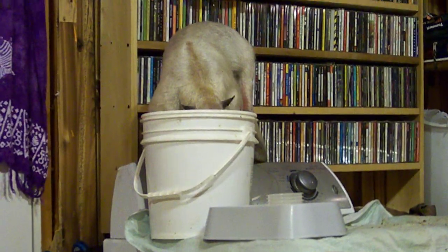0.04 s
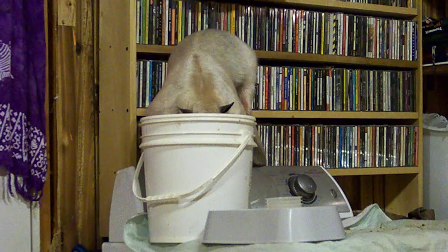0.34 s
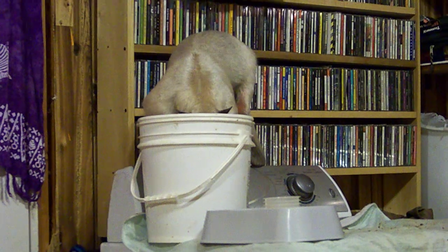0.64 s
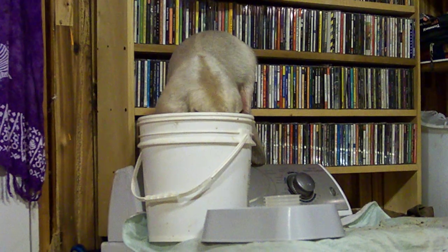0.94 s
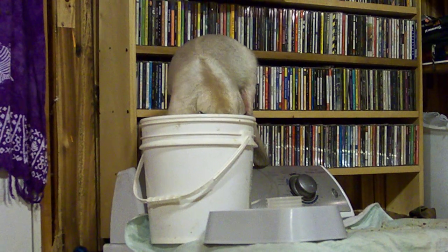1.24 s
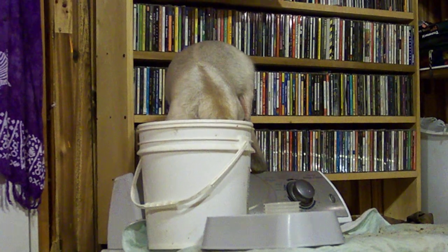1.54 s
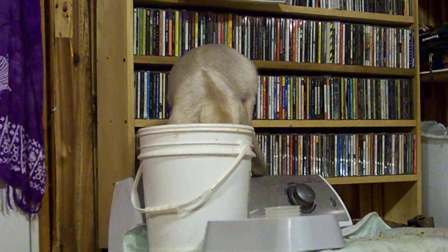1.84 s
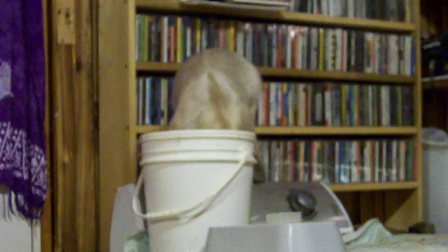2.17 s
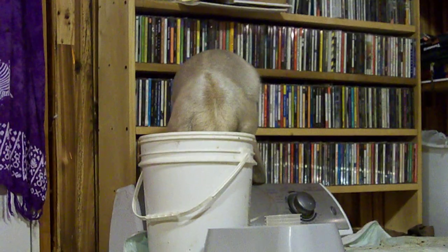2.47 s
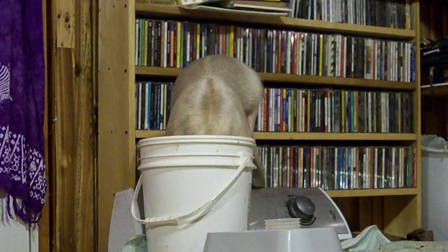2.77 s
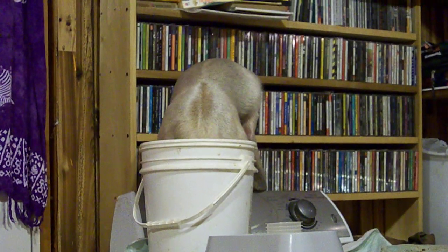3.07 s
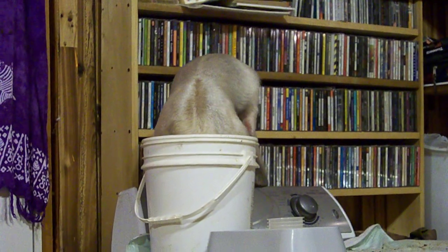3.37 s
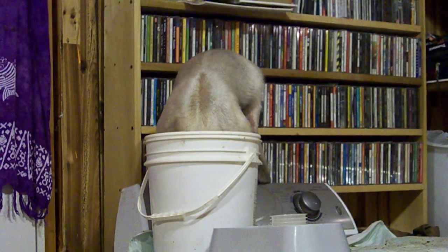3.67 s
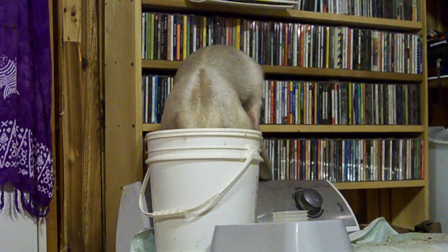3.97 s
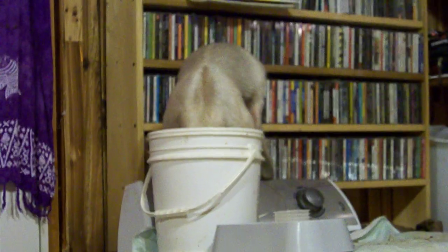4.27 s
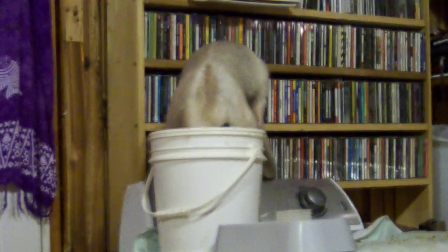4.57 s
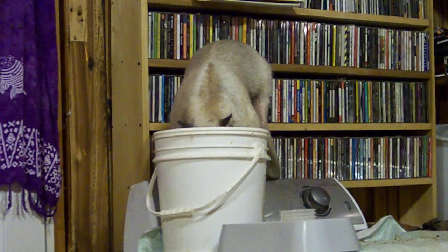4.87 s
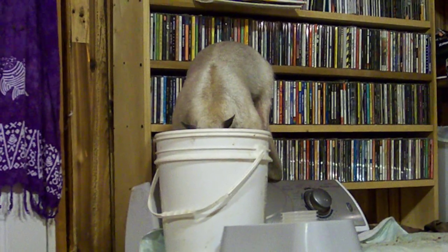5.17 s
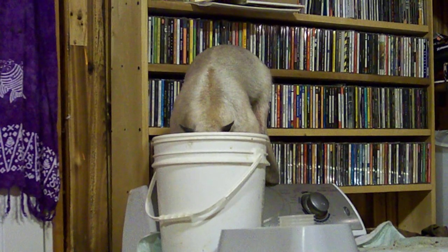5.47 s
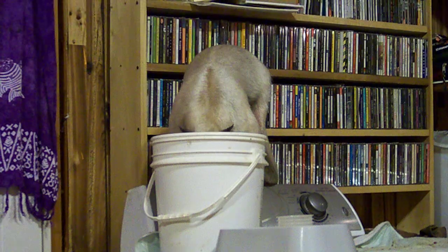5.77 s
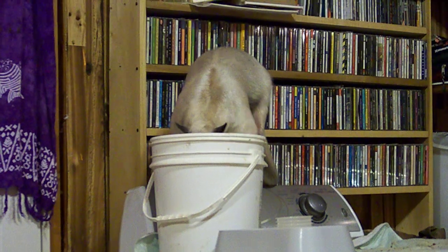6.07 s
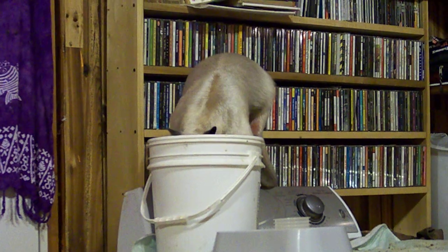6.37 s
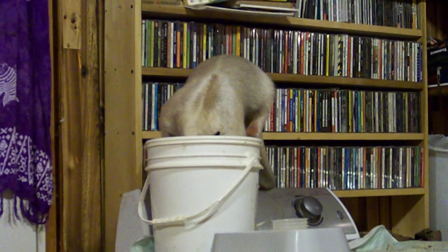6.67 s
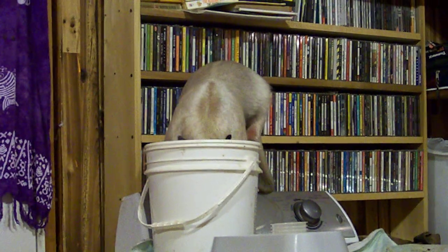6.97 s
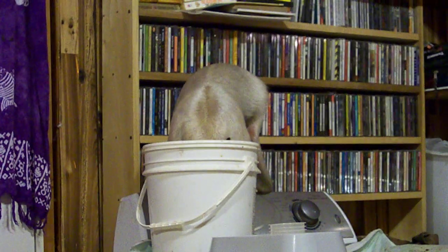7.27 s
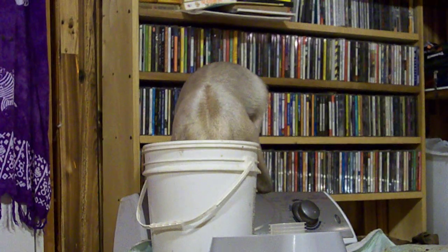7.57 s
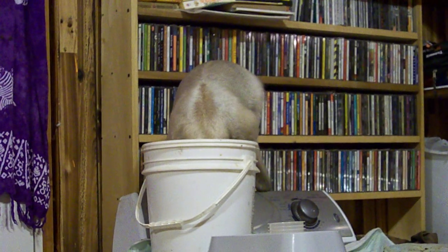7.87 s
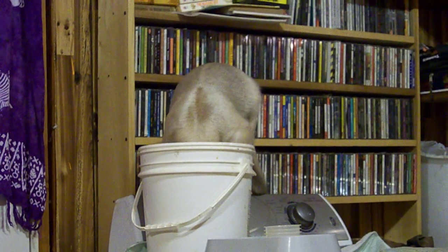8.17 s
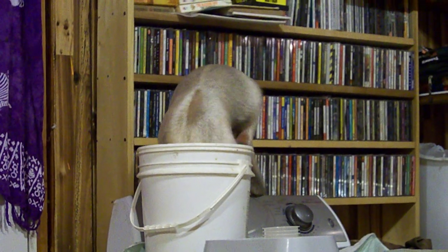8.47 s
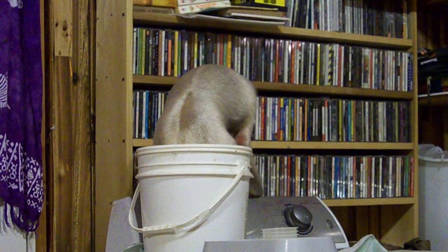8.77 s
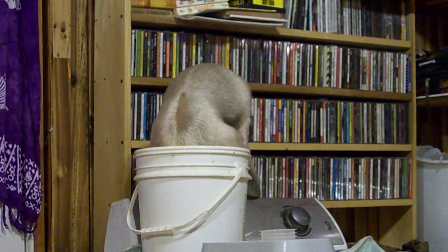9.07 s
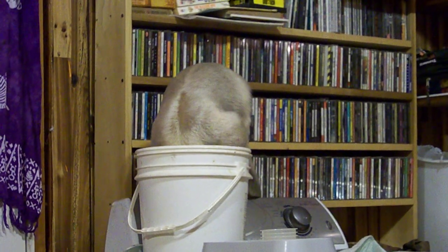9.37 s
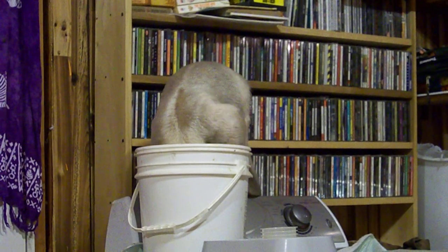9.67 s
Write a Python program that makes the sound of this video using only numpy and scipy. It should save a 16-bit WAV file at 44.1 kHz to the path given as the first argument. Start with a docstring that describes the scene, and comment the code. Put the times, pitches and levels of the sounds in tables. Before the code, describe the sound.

In a small room with a faint ventilation hum, dry food shifts and clicks inside a plastic bucket slightly to the left. A cat noses through it in two bouts separated by a short pause. Each shove brings a gritty rustle and a low hollow rub from the plastic, while single pieces crack or strike the wall. The bucket takes an occasional soft knock, and everything rings only briefly.

```python
"""Cat rooting in a food bucket

A small furnished room with faint steady ventilation; a little left of the microphone, a cat is head
down in a plastic bucket of dry food. Shoved pieces rub and tick against each other, the pushing makes
the bucket drum, single pieces snap or hit the wall, and now and then the bucket takes a soft knock.
Each of these rings briefly in the bucket and the room."""
import sys
import numpy as np
from scipy import signal
from scipy.fft import rfft, irfft
from scipy.io import wavfile
from scipy.ndimage import uniform_filter1d

SR = 44100
rng = np.random.default_rng(int(sys.argv[2]) if len(sys.argv) > 2 else 0)


def put_to_file(sound):
    """Save the sound as 16-bit audio at rate SR, in the file named by the first command-line argument."""
    columns = np.atleast_2d(sound).T  # one column per channel
    safe = np.clip(columns, -1, 1)
    whole_steps = np.round(safe * 32767)
    wavfile.write(sys.argv[1], SR, whole_steps.astype(np.int16))


N = 432621
TIME = np.arange(N) / SR

# Colour of the ventilation. Each row: frequency in Hz, gain in dB.
VENTILATION_COLOUR = [(20, -8.5), (54, -3.5), (81, -5.5), (125, -8), (228, -14), (300, -22.5), (480, -12),
                      (660, -12), (950, -19), (1160, -12), (1400, -21.5), (2120, -21.5), (6380, -24.5),
                      (8000, -35)]
# Two bouts of rooting, a pause between them. Each row: start in seconds, length in seconds.
ROOTING_BOUTS = [(0.0, 4.42), (5.88, 3.4)]
# Shoves of the muzzle. Each row: start in seconds, length in seconds, relative level of the sliding
# food in dB, relative push on the bucket in dB, brightness of the ticks in dB.
MUZZLE_SHOVES = [ (0.161, 0.038, -39, -50.5, 5.5), (0.246, 0.014, -37.5, -47, 5.5),
                 (0.354, 0.042, -44.5, -52, 0), (0.457, 0.062, -45, -48, 2.5),
                 (0.646, 0.022, -45, -48.5, 2.5), (0.798, 0.041, -42, -45, -0.5),
                 (0.872, 0.016, -50, -51, -8), (0.943, 0.014, -53.5, -58, 6),
                 (1.075, 0.18, -46, -56.5, -1.5), (1.366, 0.027, -40.5, -47, -12),
                 (1.531, 0.044, -49, -51, -4), (1.705, 0.032, -53, -48.5, -10),
                 (1.796, 0.057, -44.5, -50.5, -2), (1.943, 0.096, -47.5, -53, -3),
                 (2.125, 0.19, -40, -52.5, 3.5), (2.355, 0.2, -53, -60.5, 8),
                 (2.696, 0.035, -50, -53.5, -3), (2.827, 0.053, -50.5, -42.5, 1),
                 (2.963, 0.09, -49.5, -50.5, -4), (3.14, 0.09, -45.5, -52, -2.5),
                 (3.259, 0.035, -38, -50.5, 4.5), (3.34, 0.02, -47.5, -59, -1),
                 (3.448, 0.24, -50.5, -57, 0.5), (3.795, 0.081, -48.5, -54.5, -6),
                 (3.987, 0.051, -43.5, -55, -2), (4.195, 0.057, -48, -67, 2), (4.31, 0.027, -52, -59.5, 2),
                 (4.424, 0.23, -63.5, -71, 4), (5.873, 0.042, -45, -61, 2.5), (6.04, 0.16, -49, -54, 6.5),
                 (6.293, 0.026, -42, -46, -9.5), (6.37, 0.018, -50, -50, 0.5), (6.5, 0.051, -44, -50, -1.5),
                 (6.665, 0.059, -50, -45, -3), (6.956, 0.11, -50.5, -45.5, 4.5),
                 (7.14, 0.1, -49, -46.5, -5), (7.321, 0.1, -39.5, -48, 2.5), (7.554, 0.054, -38, -55.5, 5),
                 (7.656, 0.13, -40, -57.5, 5.5), (7.787, 0.14, -46.5, -51.5, 3.5),
                 (7.999, 0.21, -48, -56, 10), (8.346, 0.06, -59, -53, 12.5), (8.491, 0.032, -48, -45.5, -2),
                 (8.659, 0.034, -30.5, -49.5, 6.5), (8.891, 0.087, -37.5, -67, 5),
                 (9.022, 0.12, -44.5, -76, 7), (9.177, 0.29, -41.5, -65, 7.5),
                 (9.523, 0.054, -44.5, -65, 7.5), (9.636, 0.049, -38.5, -53.5, 7),
                 (9.785, 0.02, -37.5, -72, 3)]
# Colour of the sliding food. Each row: frequency in Hz, gain in dB.
FOOD_COLOUR = [(240, -41.5), (450, -4.5), (650, -2), (940, -5), (1470, 2), (2000, -3.5), (2400, -2),
               (3200, -2), (4000, -9), (6300, -14.5), (7150, -17.5), (8000, -38)]
# Ringing of the plastic wall that the food touches. Each row: pitch in Hz, width in Hz, gain in dB.
WALL_MODES = [(1512, 27, -15), (1948, 110, -6.5), (3190, 240, -17)]
# Resonances of the bucket and the air in it. Each row: pitch in Hz, width in Hz, relative drive in dB.
BUCKET_MODES = [(101, 70, -13.5), (161, 66, -8), (210.7, 29.7, 3.5), (252.5, 25, -6), (464, 116, 3),
                (517, 90, 3.5), (656, 89, -4.5), (852, 220, -13.5)]
# Single pieces snapping or striking the wall. Each row: start in seconds, relative level in dB,
# pitch in Hz, seconds for the crumbling to fall 60 dB.
PIECE_SNAPS = [(0.1042, -34, 3160, 0.008), (0.129, -29.5, 2070, 0.0059), (0.153, -36, 3400, 0.034),
               (0.157, -29, 3220, 0.025), (0.3492, -36.5, 3900, .008), (0.456, -38, 3500, 0.039),
               (0.4922, -31.5, 3350, 0.055), (0.8827, -29.5, 3600, 0.0019), (1.1527, -28, 3250, 0.039),
               (1.2524, -41, 2720, 0.0061), (1.3627, -29, 2530, 0.028), (2.2906, -28, 2860, 0.013),
               (2.5567, -8, 3370, 0.0042), (2.774, -41, 2340, 0.0044), (2.927, -44.5, 5500, 0.0076),
               (5.979, -20, 2640, 0.011), (5.9852, -19, 3000, 0.033), (6.015, -20, 2020, 0.0081),
               (6.2739, -35.5, 2010, 0.015), (7.401, -34, 2440, 0.0091), (8.01, -29, 5400, 0.067),
               (8.0123, -29, 4700, 0.048), (8.147, -30, 4200, 0.019), (8.1499, -27, 4200, 0.039),
               (8.437, -47, 6800, .008), (8.885, -28.5, 5760, 0.016), (9.322, -27.5, 3800, 0.012),
               (9.371, -25.5, 3450, 0.01), (9.625, -31.5, 3640, 0.078), (9.761, -28, 2370, 0.06),
               (9.77, -24.5, 2860, 0.015)]
# Colour of a snapping piece. Each row: frequency in Hz, gain in dB.
SNAP_COLOUR = [(200, -22), (600, -2.5), (1300, 8), (3000, 3), (5500, 0), (6900, -1.5), (7800, -15)]
# Knocks as the bucket is struck or shifts. Each row: start in seconds, relative level in dB, pitch in Hz.
BUCKET_KNOCKS = [(2.558, -32, 750), (3.785, -36, 118), (4.570, -36.5, 1310), (4.613, -44, 270),
                 (5.140, -45, 1800), (5.156, -46, 1800), (8.833, -43, 304)]
# The bucket stands left of the microphone. Each row: frequency in Hz, left minus right in dB.
LEFT_BIAS = [(500, 1), (1100, 1), (2000, 5.5), (4000, 8), (7000, 2)]


def undb(db):
    """Decibels to gain."""
    return 10 ** (np.asarray(db) / 20)


def unit(x):
    """Scale to rms 1."""
    return x / np.sqrt(np.mean(x ** 2))


def colour(x, points, size=2048):
    """Causal filter through (Hz, dB) points, built from the cepstrum."""
    hz, db = np.transpose(points)
    bin_hz = np.maximum(np.fft.rfftfreq(size, 1 / SR), 1)
    gain = undb(np.interp(np.log(bin_hz), np.log(hz), db))
    cepstrum = irfft(np.log(gain))
    cepstrum[1:size // 2] *= 2
    cepstrum[size // 2 + 1:] = 0
    response = irfft(np.exp(rfft(cepstrum)))
    return signal.oaconvolve(np.atleast_2d(x), response[None], axes=-1)[:, :x.shape[-1]]


def ring(x, hz, width_hz):
    """One resonance, gain 1 at its centre."""
    return signal.lfilter(*signal.iirpeak(hz, max(hz / width_hz, .5), fs=SR), x)


def noise_pair(count, likeness):
    """Two partly alike noises, left and right."""
    mid, side = rng.standard_normal((2, count))
    return np.sqrt((1 + likeness) / 2) * mid + np.sqrt((1 - likeness) / 2) * np.array([side, -side])


def wander(rate):
    """Random levels held 1 / rate seconds and slewed."""
    hold = int(SR / rate)
    levels = rng.standard_normal(N)
    step = (np.arange(N) + rng.integers(SR)) // hold
    return uniform_filter1d(levels[step], hold)


def contacts(rate, scatter_db, limit_db=22):
    """Random tiny impacts, most weak and a few strong."""
    chance, size, sign = rng.random(N), rng.exponential(size=N), rng.choice([-1, 1], N)
    return (chance < rate / SR) * sign * undb(np.minimum(scatter_db * size, limit_db))


def add(out, start_s, x):
    """Mix a sound in at a time."""
    i = int(start_s * SR)
    out[:, i:i + x.shape[-1]] += x[:, :N - i]


def to_microphone(x, bucket_db, room_db, likeness, shelf_s=.0042, shelf_db=-5,
                  bucket_t60=0.11, room_t60=0.29, room_build_s=0.013):
    """From a spot in the bucket: direct sound, quick echoes inside, a slap off a shelf, then the room."""
    t = TIME[:SR // 2]
    walls = undb(-60 * t / bucket_t60)
    room = undb(-60 * t / room_t60) * np.minimum(t / room_build_s, 1) ** 2
    walls = undb(bucket_db) * walls / np.linalg.norm(walls)
    room = undb(room_db) * room / np.linalg.norm(room)
    response = np.hypot(walls, room) * noise_pair(len(t), likeness)
    response[:, 0] += 1  # direct sound
    slap = int(shelf_s * SR)
    response[[0, 1], [slap, slap + 2]] += undb(shelf_db)  # it arrives at a slant
    response /= np.linalg.norm(response[0])
    return signal.oaconvolve(x[None], response, axes=-1)[:, :len(x)]


def ventilation(level_db=-54.5, split_hz=1200):
    """Steady air all round the microphone: the rumble is much alike on both sides, the hiss is not."""
    rumble = signal.lfilter(*signal.butter(1, split_hz, fs=SR), noise_pair(N, likeness=.59))
    hiss = signal.lfilter(*signal.butter(1, split_hz, "high", fs=SR), noise_pair(N, likeness=.15))
    return unit(colour(rumble + hiss, VENTILATION_COLOUR)) * undb(level_db)


def movement(start_s, length_s, build_db_per_s=320, ease_db_per_s=2, settle_db_per_s=220):
    """Gain of one movement: it builds quickly, eases a little, then the heap settles."""
    t = TIME - start_s
    return undb(build_db_per_s * np.clip(t, -1, 0)
                - ease_db_per_s * np.clip(t, 0, min(length_s, .5))
                - settle_db_per_s * np.clip(t - length_s, 0, 1))


def rooting(fidget_food_db=-58.5, fidget_push_db=-62):
    """Strength of the sliding, its brightest ticks and the push on the bucket; movements add in power."""
    # within a bout the head never rests, even between shoves
    fidget = sum(movement(*bout) for bout in ROOTING_BOUTS)
    power = np.outer(undb([fidget_food_db, fidget_food_db, fidget_push_db]), fidget) ** 2
    for start_s, length_s, food_db, push_db, bright_db in MUZZLE_SHOVES:
        gains = undb([food_db, food_db + bright_db, push_db])
        power += np.outer(gains ** 2, movement(start_s, length_s) ** 2)
    return np.sqrt(power)


def food_rustle(slide, bright, gain_db=-4.5, wall_exponent=0.78, treble_hz=3900):
    """Pieces of several sizes tick against each other in little slides, harder as the muzzle shoves."""
    flicker_db = .8 * wander(rate=80)
    heap = 0
    for hz in np.geomspace(1200, 6500, num=8):
        ticks = contacts(rate=480, scatter_db=4.0, limit_db=19)
        ticks = unit(0.2 * ticks + ring(ticks, hz, width_hz=1500))
        # now one size of piece is caught, now another
        ticks *= slide * undb(flicker_db + 1.5 * wander(rate=12))
        # each lies at its own spot in the heap, with its own echoes
        shelf_s = rng.uniform(.001, .007)
        heap = heap + to_microphone(ticks, bucket_db=0, room_db=-3, likeness=.2, shelf_s=shelf_s)
    heap = colour(heap, FOOD_COLOUR)
    # the brightest shoves scrape along the wall and make it ring most
    wall_rings = [undb(db) * ring(heap, hz, width_hz) for hz, width_hz, db in WALL_MODES]
    heap = heap + (bright / slide) ** wall_exponent * sum(wall_rings)
    treble = signal.sosfilt(signal.butter(2, treble_hz, "high", fs=SR, output="sos"), heap)
    # filtered again backwards, so the treble stays in phase with the heap
    treble = signal.sosfilt(signal.butter(2, treble_hz, "high", fs=SR, output="sos"), treble[:, ::-1])
    return undb(gain_db) * (heap + treble[:, ::-1] * (bright / slide - 1))


def bucket_drumming(push, gain_db=-0.5):
    """Food grinding on the plastic drives the low resonances, each more or less as the contact moves."""
    body = 0
    for hz, width_hz, db in BUCKET_MODES:
        grind = contacts(rate=700, scatter_db=3) * undb(db + wander(rate=14))
        body += ring(ring(grind, hz, width_hz), hz, width_hz)
    drum = to_microphone(body, bucket_db=-15, room_db=-13, likeness=.7, shelf_s=.001)
    return unit(drum) * push * undb(gain_db)


def piece_snaps(gain_db=4, crack_share=0.57, low_cut_ratio=0.54):
    """A hard piece cracks and rings for a few cycles; a longer crumbling makes it a crunch."""
    out, t = np.zeros((2, N)), TIME[:SR // 2]
    for start_s, db, hz, t60 in PIECE_SNAPS:
        force = undb(-60 * t / t60)
        # a fracture excites all pitches nearly evenly, in a random order
        spectrum = rfft(force * rng.standard_normal(len(t)), SR)
        crack = irfft(spectrum / np.abs(spectrum) ** .75)[:len(t)]
        piece = colour(crack_share * crack + ring(crack, hz, width_hz=1500), SNAP_COLOUR)[0]
        # a small piece radiates little far below its own pitch
        piece = signal.lfilter(*signal.butter(2, low_cut_ratio * hz, "high", fs=SR), piece)
        piece *= np.linalg.norm(force) / np.linalg.norm(piece)
        snap = to_microphone(piece, bucket_db=-2, room_db=-3, likeness=.15)
        add(out, start_s, undb(db + gain_db) * snap)
    return out


def bucket_knocks(t60=0.025):
    """Short soft blows as the bucket is bumped or takes the cat's weight."""
    out, t = np.zeros((2, N)), TIME[:SR // 2]
    for start_s, db, hz in BUCKET_KNOCKS:
        blow = rng.standard_normal(len(t)) * undb(-60 * t / t60)
        blow = ring(ring(blow, hz, width_hz=hz), hz, width_hz=hz)  # the food damps the wall heavily
        blow /= np.abs(blow).max()
        add(out, start_s, undb(db) * to_microphone(blow, bucket_db=-12, room_db=-9, likeness=.9))
    return out


def scene():
    """The bucket a little left of the microphone, the room air all round."""
    slide, bright, push = rooting()
    left, right = food_rustle(slide, bright) + piece_snaps() + bucket_drumming(push) + bucket_knocks()
    left = colour(left, [(hz, db / 2) for hz, db in LEFT_BIAS])
    right = colour(right, [(hz, -db / 2) for hz, db in LEFT_BIAS])
    return np.vstack([left, right]) + ventilation()


def record(dry, hollow_hz=305, hollow_depth=0.35, top_hz=7750):
    """At the microphone the sound is hollow in a narrow low band, and the top is cut off steeply."""
    hollowed = dry - hollow_depth * ring(dry, hollow_hz, width_hz=70)
    return signal.sosfilt(signal.ellip(8, .2, 70, top_hz, fs=SR, output="sos"), hollowed)


dry = scene()
out = record(dry)
put_to_file(out)
```